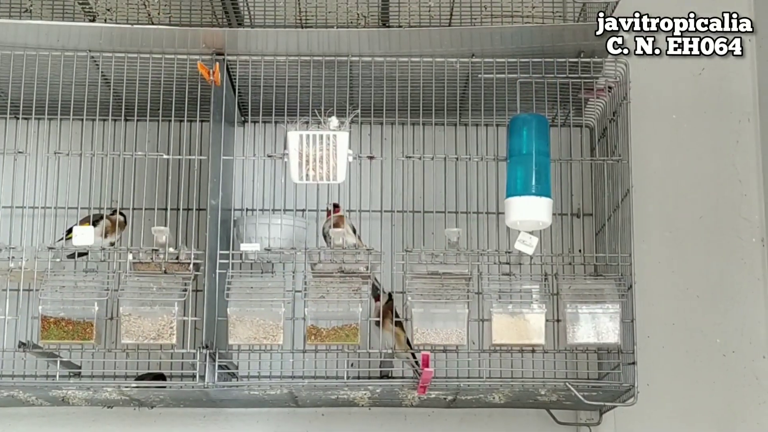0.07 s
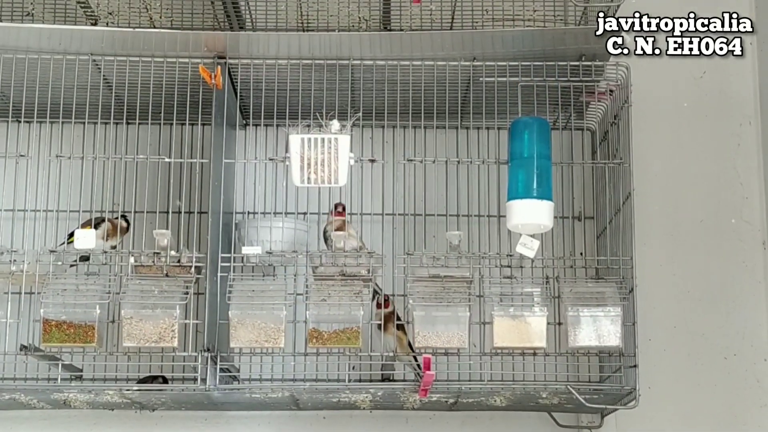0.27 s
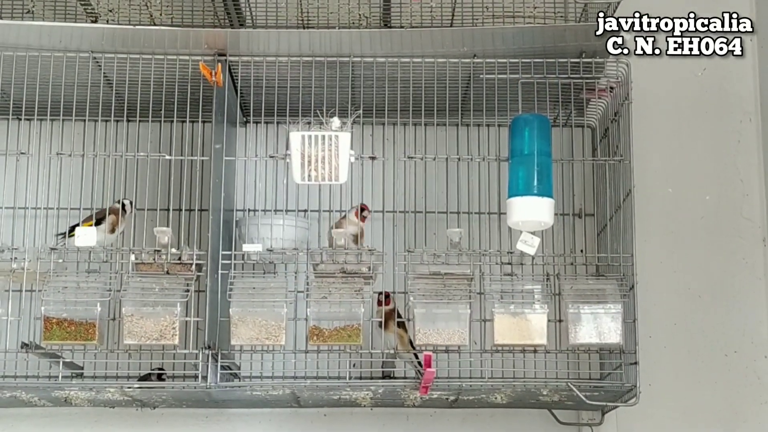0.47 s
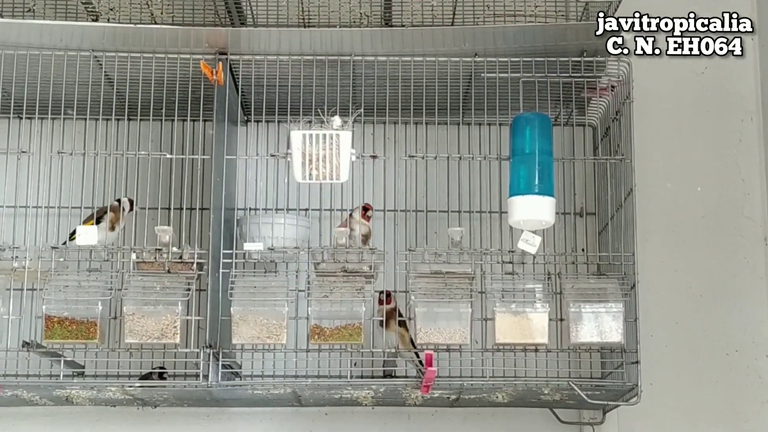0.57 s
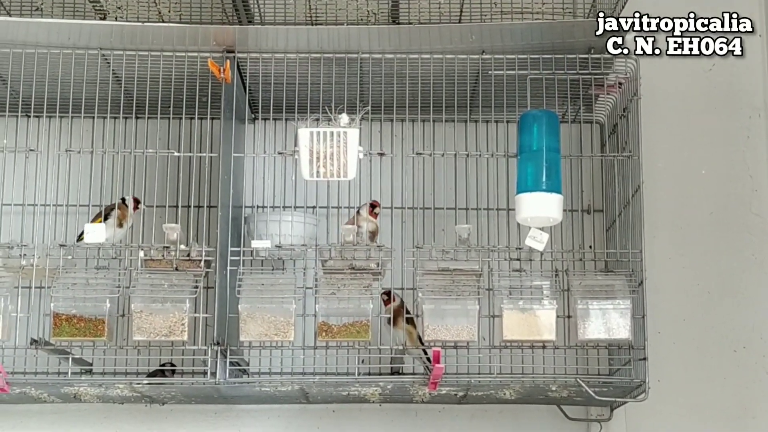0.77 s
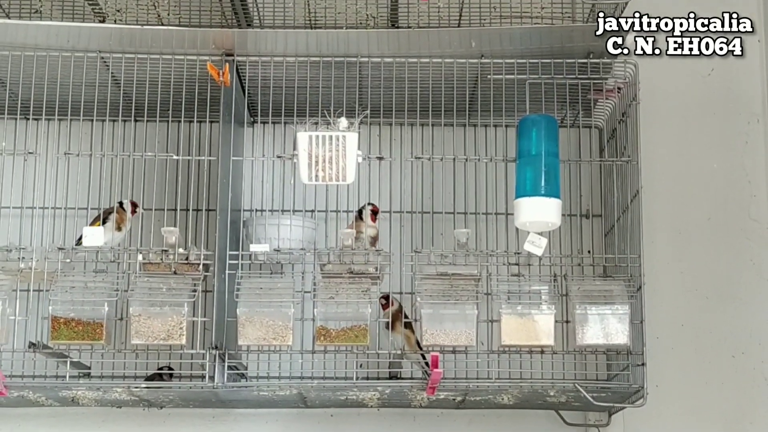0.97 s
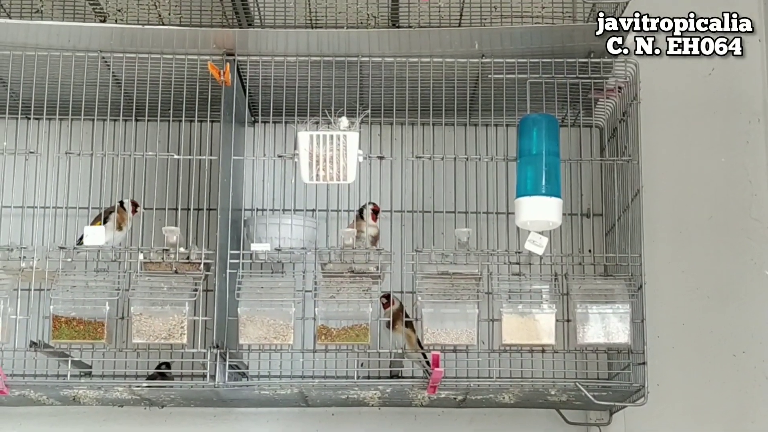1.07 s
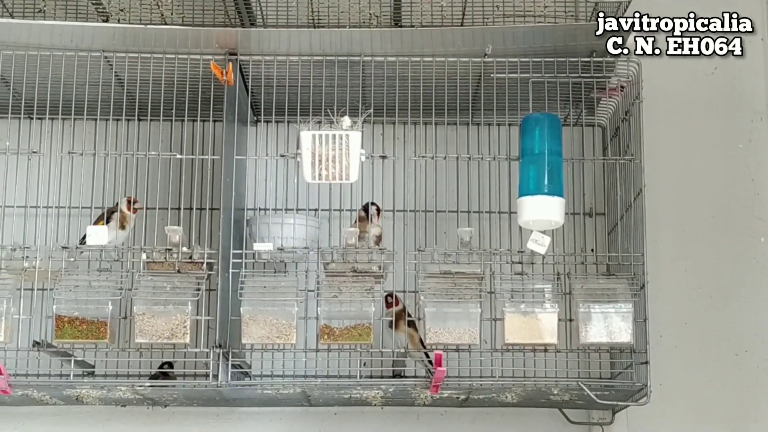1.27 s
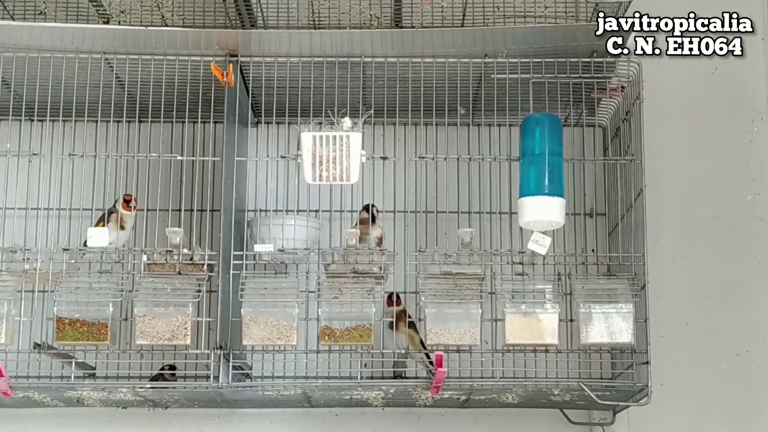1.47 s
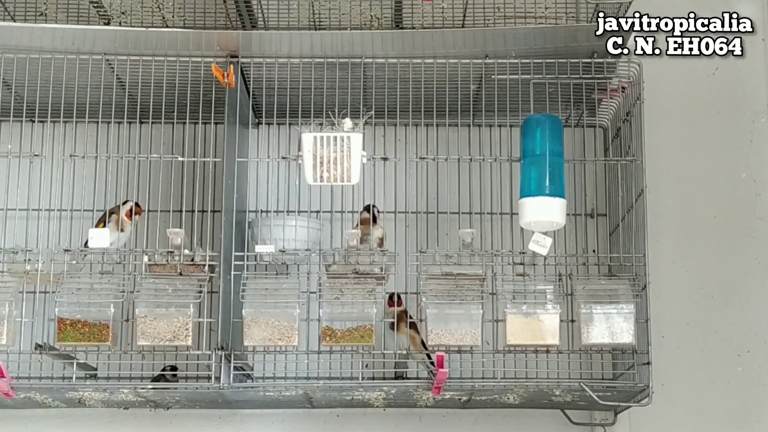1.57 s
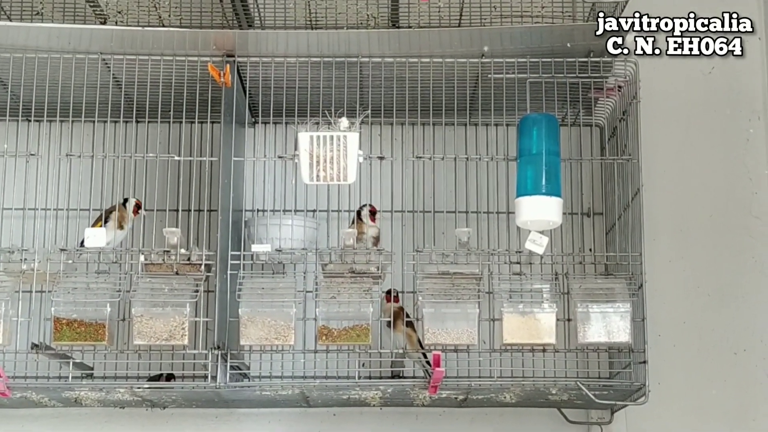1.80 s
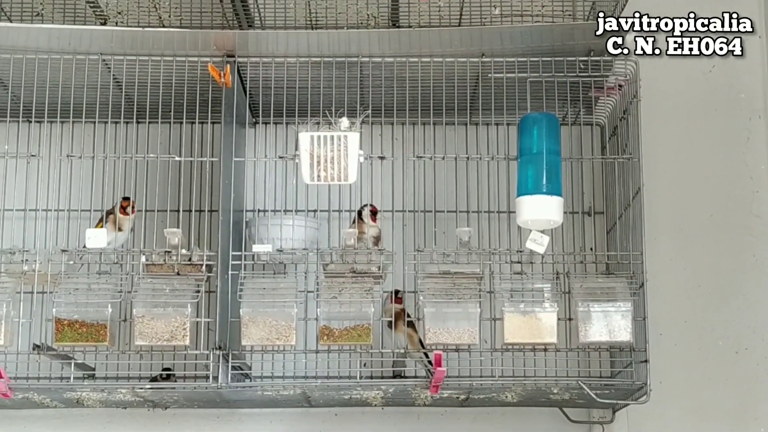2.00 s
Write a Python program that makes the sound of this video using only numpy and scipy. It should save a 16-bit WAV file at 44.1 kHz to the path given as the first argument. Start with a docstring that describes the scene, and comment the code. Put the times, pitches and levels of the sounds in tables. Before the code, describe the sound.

Bright, thin birdsong from caged finches comes in short bursts with gaps between, ending in a raspy chatter; beaks and claws tick on wire. Stereo microphone in a small reverberant room with faint low rumble.

```python
"""Goldfinches in a cage

Goldfinches twitter in a wire cage in a small, hard-walled room: two two-voiced chirps, a long rising slur
and a whistled phrase, all swept harmonic tones, then a short harsh chatter of pulsed resonant noise.
Beaks and claws tick on the cage as decaying noise clicks. Beneath lie shaped-noise air, a hum of sines
and a low rumble that drops away and partly returns."""
import sys
import numpy as np
from scipy import signal
from scipy.fft import rfft, irfft
from scipy.io import wavfile
from scipy.ndimage import uniform_filter1d

SR = 44100
rng = np.random.default_rng(int(sys.argv[2]) if len(sys.argv) > 2 else 0)


def unload_audio(sound):
    """Save the sound as a 16-bit wav file, at the path given as the first command line argument."""
    columns = np.transpose(np.atleast_2d(sound))
    # keep every value between -1 and 1, then stretch to whole-number steps
    steps = np.round(np.clip(columns, -1, 1) * 32767)
    wavfile.write(sys.argv[1], SR, steps.astype(np.int16))


N = 89964


def amp(db):
    """Decibels to gain."""
    return 10 ** (np.asarray(db) / 20)


def unit(x):
    """Scales to rms 1."""
    return x / np.sqrt(np.mean(x ** 2) + 1e-20)


def read(points, hz):
    """Reads a table on a log-frequency axis."""
    f, value = np.transpose(points)
    return np.interp(np.log(hz + 1), np.log(f), value)


def add(mix, start_s, sound, pan_db=0):
    """Places a sound in the stereo mix; positive pan is left."""
    part = mix[:, max(round(start_s * SR), 0):][:, :len(sound)]
    part += amp([[pan_db / 2], [-pan_db / 2]]) * sound[:part.shape[1]]


def sine(hz):
    """Unit sine that follows a pitch track."""
    return np.sin(2 * np.pi * np.cumsum(hz) / SR)


def noise(shape):
    """Noise of rms 1 with gain shape(Hz)."""
    spectrum = rfft(rng.standard_normal(N))
    return unit(irfft(spectrum * shape(np.fft.rfftfreq(N, 1 / SR)), N))


def colored(table):
    """Noise of rms 1 with the spectrum of a (freq_hz, level_db) table."""
    return noise(lambda f: amp(read(table, f)))


def wobble(hz):
    """Random motion up to a given speed."""
    return noise(lambda f: 1 / (1 + (f / hz) ** 4))


def band(hz, width_hz):
    """Noise in one resonance."""
    return noise(lambda f: 1 / (1 + ((f - hz) / width_hz * 2) ** 2))


def arch(u, peak, pointed):
    """One swell of effort, strongest at peak (0-1)."""
    warped = np.interp(u, [0, np.clip(peak, .05, .95), 1], [0, .5, 1])
    return np.abs(np.sin(np.pi * warped)) ** pointed


# air spectrum, relative: freq_hz, level_db
AIR_SPECTRUM = [(15, -10), (25, -4.5), (54, -2.5), (90, -14.5), (114, -8.5), (275, -10.5), (378, -12.5),
                (534, -14.5), (661, -14), (716, -12), (886, -15), (1040, -16), (3010, -21), (3540, -23),
                (4620, -33.5), (8510, -20.5), (14500, -37)]
# air stereo coherence: freq_hz, likeness_0_1
AIR_LIKENESS = [(100, 1), (250, 0.96), (500, 0.66), (1000, 0.16), (3000, 0), (12000, 0)]
AIR_DB, AIR_PATCH_DB = -40, 1.58


def air():
    """Moving air: shaped noise with patchy level, alike on both sides only at low frequencies."""
    hz, _, z = signal.stft(rng.standard_normal((2, N)), SR, nperseg=2048)
    same = np.clip(read(AIR_LIKENESS, hz), -1, 1)[:, None]
    z = np.array([z[0], same * z[0] + np.sqrt(1 - same ** 2) * z[1]])
    patches = uniform_filter1d(rng.standard_normal(z.shape[1:]), size=24, axis=0)
    patches = unit(uniform_filter1d(patches, size=3, axis=1))
    gain = amp(read(AIR_SPECTRUM, hz)[:, None] + AIR_PATCH_DB * patches)
    flow = signal.istft(z * gain, SR, nperseg=2048)[1][:, :N]
    return amp(AIR_DB) * unit(flow)


# machine hum partials: freq_hz, level_db
HUM_PARTIALS = [(118.6, -53), (220.7, -55.5), (269.2, -54), (538.3, -55), (597.5, -57.5), (721.4, -60.5)]
HUM_WAVER_RAD, HUM_WAVER_HZ = 0.33, 2.9


def hum():
    """Machine hum: steady sines whose phases wander slowly."""
    t = np.arange(N) / SR
    out = np.zeros(N)
    for hz, level_db in HUM_PARTIALS:
        phase = 2 * np.pi * (hz * t + rng.random()) + HUM_WAVER_RAD * wobble(HUM_WAVER_HZ)
        out += amp(level_db) * np.sqrt(2) * np.sin(phase)
    return out


# rumble level: time_s, level_db
RUMBLE_LEVEL = [(0, -41), (.4, -40), (.48, -47.5), (.66, -41.5), (.8, -62), (2.04, -49.5)]
RUMBLE_HZ, RUMBLE_WAVER_RAD, RUMBLE_WAVER_HZ = 46.4, 1, 15


def rumble():
    """Low rumble: one sine of wandering phase and changing level."""
    t = np.arange(N) / SR
    level = amp(np.interp(t, *np.transpose(RUMBLE_LEVEL)))
    phase = 2 * np.pi * RUMBLE_HZ * t + RUMBLE_WAVER_RAD * wobble(RUMBLE_WAVER_HZ)
    return level * np.sqrt(2) * np.sin(phase)


# ticks: start_s, level_db
TICK_EVENTS = [(.105, -31), (0.129, -33.5), (.805, -33), (.881, -28), (.959, -27.5), (.978, -38),
               (1.5, -33.5), (1.571, -28), (1.991, -33.5), (2.028, -43)]
# tick spectrum, relative: freq_hz, level_db
TICK_SPECTRUM = [(1500, -21), (3500, -8.5), (6000, -17.5), (8500, 2.5), (10500, -12), (15000, -20.5)]
TICK_DECAY_S = 0.0031


def ticks():
    """Beaks and claws on the cage: bright noise clicks that decay exponentially."""
    out, t = np.zeros((2, N)), np.arange(SR // 20) / SR
    for start_s, level_db in TICK_EVENTS:
        click = np.exp(-t / TICK_DECAY_S) * colored(TICK_SPECTRUM)[:len(t)]
        add(out, start_s, amp(level_db) * click)
    return out


# harsh syllables and raspy onsets: start_s, length_s, center_hz, width_hz, level_db, hiss_db (re resonance)
RASP_EVENTS = [(0.179, 0.029, 12200, 2500, -37, 3.5), (0.334, 0.069, 11700, 1600, -40, -4),
               (0.635, 0.032, 8400, 1600, -33, 1.5), (1.594, 0.028, 4900, 1500, -32, 1.5),
               (1.655, 0.036, 3850, 900, -33, 8), (1.66, 0.026, 7800, 2070, -21.5, -22),
               (1.716, 0.025, 4400, 1430, -29, -4), (2.027, 0.012, 5800, 2000, -38, 7.5)]
# rasp hiss spectrum, relative: freq_hz, level_db
RASP_HISS = [(1000, -38), (2000, -2), (2900, -9.5), (3700, 1), (6000, -7.5), (8500, 3), (11000, -7),
             (15000, -22)]
PULSE_HZ, PULSE_DEPTH = 392.4, 0.68
PULSE_DRIFT, PULSE_DRIFT_HZ = 0.262, 121  # share of pulse rate, speed
RASP_PEAK, RASP_POINTED = 0.47, 0.76


def chatter():
    """Harsh syllables: uneven puffs through a broad resonance, with hiss."""
    out = np.zeros((2, N))
    for start_s, length_s, center_hz, width_hz, level_db, hiss_db in RASP_EVENTS:
        u = np.linspace(0, 1, round(length_s * SR))
        puffs = 1 + PULSE_DEPTH * sine(PULSE_HZ * (1 + PULSE_DRIFT * wobble(PULSE_DRIFT_HZ)))
        breath = band(center_hz, width_hz) + amp(hiss_db) * colored(RASP_HISS)
        voice = (unit(puffs) * breath)[:len(u)]
        add(out, start_s, amp(level_db) * arch(u, RASP_PEAK, RASP_POINTED) * voice, pan_db=-1.6)
    return out


# spectrum of the hiss on each note, relative: freq_hz, level_db
NOTE_HISS = [(1200, -9), (2200, 2), (4000, -6), (6000, 2.5), (8500, 3), (12500, -6), (15000, -21)]
NOTE_HISS_DB = -19
# at full roughness: share of pitch, speed, share of level
JITTER, JITTER_HZ, SHIMMER = 0.047, 450, 0.3
FLUTTER, FLUTTER_HZ = 0.066, 259.2  # share of pitch at full roughness, speed
FLUTTER_DRIFT, FLUTTER_DRIFT_HZ = 0.17, 56.5  # share of flutter rate, speed
FOURTH_DB = -19  # re 3rd harmonic


def syrinx(hz, second_db, third_db, rough):
    """Whistle with overtones and hiss; pitch and level tremble with roughness."""
    n = len(hz)
    flutter = sine(FLUTTER_HZ * (1 + FLUTTER_DRIFT * wobble(FLUTTER_DRIFT_HZ)[:n]))
    hz = hz * (1 + rough * (JITTER * wobble(JITTER_HZ)[:n] + FLUTTER * flutter))
    tone = np.zeros(n)
    for k, db in enumerate([0, second_db, third_db, third_db + FOURTH_DB], 1):
        below_nyquist = k * hz < SR / 2
        tone += amp(db) * below_nyquist * sine(k * hz)
    shimmer = 1 + SHIMMER * rough * wobble(JITTER_HZ)[:n]
    hiss = amp(NOTE_HISS_DB) * colored(NOTE_HISS)[:n]
    return np.sqrt(2) * tone * shimmer + hiss


# whistled notes; overlapping rows sound together: paired voices, a combination tone, a strong overtone
# start_s, length_s, first_hz, middle_hz, last_hz, level_db, peak_0_1, pointedness,
# second_db (re fundamental), roughness_0_1, left_right_db
NOTE_EVENTS = [ (.192, 0.0326, 7020, 7700, 7200, -23, 0.27, 0.4, -34, 0.34, -2.5),
               (0.195, 0.04, 6140, 5620, 5740, -18.5, 0.78, 0.82, -19.5, 0.29, -1.5),
               (0.211, .018, 4005, 4017, 4250, -28.5, 0.74, 0.65, 7, 0.88, -2),
               (0.341, 0.0352, 6630, 7310, 7130, -21, 0, 0.84, -34, 0.15, -1),
               (0.347, .046, 6000, 5366, 5500, -19.5, 0.42, 1.3, -19.5, 0.42, -1.5),
               (0.389, .080, 1975, 2135, 2767, -38.5, 0.73, 0.53, -16, 0.78, -4),
               (0.399, 0.049, 3800, 4095, 5100, -34, 0.44, 0.33, -4.5, 0.27, -0.5),
               (.655, 0.049, 5920, 6670, 6670, -23, 0.12, 1, -21, 0.26, -2.5),
               (1.016, 0.066, 4120, 4388, 4445, -22, 0.81, 2.2, -9.5, 0.14, 2),
               (1.065, 0.016, 4710, 5400, 5860, -22, 0, 0.68, -16, 0.45, -1.5),
               (1.066, 0.014, 7900, 7870, 7800, -28.5, 0.3, .8, -40, 0.26, -6),
               (1.084, 0.026, 4760, 5590, 7410, -21.5, 0.72, 0.65, -32, 0.6, -2.5),
               (1.228, 0.02, 4434, 4946, 5000, -23, 0, 0.49, -11.5, 0.43, -2),
               (1.247, .019, 4320, 6000, 6900, -24.5, 0.16, 0.3, -26, 0.43, -2.5),
               (1.610, 0.017, 3626, 3496, 3440, -30, 0.6, 0.55, -9, 0.52, 3.5),
               (1.728, 0.02, 3720, 3575, 3520, -25.5, 0.13, 0.88, -20, 0.41, 2),
               (1.9, 0.047, 3540, 3602, 3650, -41, 0, 0.58, -8.5, 0, 4),
               (1.958, .025, 3500, 3500, 3850, -54, 0.8, .7, -9, 0.1, 2)]
NOTE_THIRD_DB = -26  # re fundamental


def notes():
    """Short notes, each bent along a parabola through three pitches."""
    out = np.zeros((2, N))
    for start_s, length_s, first, middle, last, level_db, peak, pointed, second_db, rough, pan_db in NOTE_EVENTS:
        u = np.linspace(0, 1, round(length_s * SR))
        hz = np.polyval(np.polyfit([0, .5, 1], [first, middle, last], 2), u)
        voice = syrinx(hz, second_db, NOTE_THIRD_DB, rough)
        add(out, start_s, amp(level_db) * arch(u, peak, pointed) * voice, pan_db)
    return out


# long rising slur: time_s, pitch_hz, level_db, second_db, third_db (re fundamental), roughness_0_1
RISING_SLUR = [(.463, 2846, -38, -8, 1, 0.24), (0.476, 3090, -27.5, 4.5, 7, 0.16),
               (.497, 3405, -27.5, -1.5, -8.5, 0.27), (.515, 3772, -16, -31, -47, 0.14),
               (.520, 3944, -17, -24, -39, .1), (.530, 4090, -30.5, 1, -28, 0.2),
               (0.561, 4640, -21.5, -5, -16, 0.18), (.604, 5300, -32, -25, -52, 0.35),
               (.615, 5554, -18, -8.5, -45, 0), (.628, 5590, -38, -14, -45, 0),
               (.648, 5600, -39, 3, -45, 0.2)]
# low drawn-out whistle: same columns
LOW_WHISTLE = [(1.068, 3320, -29, -14, -12, .15), (1.084, 3417, -21, -24, -15, 0.082),
               (1.101, 3503, -17.5, -31, -28, .12), (1.124, 3540, -20.5, -35, -31, 0.094),
               (1.147, 3686, -18.5, -20, -25, 0.43), (1.165, 3936, -19, -8, -25, 0.35),
               (1.19, 3926, -44, -5, -25, .5), (1.227, 4210, -29.5, -1, -21, 0.48)]


def glides():
    """Two long glides: pitch, level and overtones move between breakpoints."""
    out = np.zeros((2, N))
    for glide in (RISING_SLUR, LOW_WHISTLE):
        times, *columns = np.transpose(glide)
        t = np.arange(times[0], times[-1], 1 / SR)
        hz, level_db, second_db, third_db, rough = (np.interp(t, times, c) for c in columns)
        envelope = amp(level_db) * signal.windows.tukey(len(t), .05)
        add(out, times[0], envelope * syrinx(hz, second_db, third_db, rough), pan_db=-0.2)
    return out


# reverberation time: freq_hz, t60_s
ROOM_DECAY = [(500, 1), (3500, 0.39), (6000, 0.36), (9000, 0.35), (14000, 0.27)]
DIRECT_DB, EARLY_DB, TAIL_DB = -7, -3.5, -2.5
EARLY_DECAY_S, EARLY_PER_S = 0.013, 900


def room(x):
    """Direct sound, quick reflections from the cage panels, and the tail of the room."""
    t = np.arange(SR // 2) / SR
    taps = rng.standard_normal((2, len(t))) * np.clip((t - .004) / 0.0027, 0, 1)
    hz, when, z = signal.stft(taps, SR, nperseg=256)
    decay = amp(-60 * when / read(ROOM_DECAY, hz)[:, None])
    tail = signal.istft(z * decay, SR, nperseg=256)[1][:, :len(t)]
    signs = rng.choice([-1., 1.], tail.shape)
    hits = rng.random(tail.shape) < EARLY_PER_S / SR
    early = signs * hits * np.exp(-t / EARLY_DECAY_S) * (t > .001)
    response = np.zeros(tail.shape)
    for db, part in [(EARLY_DB, early), (TAIL_DB, tail)]:
        response += amp(db) * part / np.linalg.norm(part, axis=1, keepdims=True)
    return amp(DIRECT_DB) * x + signal.fftconvolve(x, response, axes=1)[:, :N]


# microphone colour: freq_hz, left_right_db
MIC_TILT = [(2000, 1), (3500, 3), (5000, -1), (6500, 0.5), (8000, -2), (9300, 6), (13000, 3)]
RIGHT_DELAY_S = .00013  # left microphone is nearer


def microphones(x):
    """Each side has its own colour, and the right one hears the birds slightly later."""
    hz = np.fft.rfftfreq(N, 1 / SR)
    tilt_db = read(MIC_TILT, hz)
    delay = np.exp(-2j * np.pi * hz * RIGHT_DELAY_S)
    return irfft(rfft(x) * np.array([amp(tilt_db / 2), amp(-tilt_db / 2) * delay]), N)


def scene():
    """The birds in their room, over air, hum and rumble."""
    background = air() + hum() + rumble()
    birds = ticks() + chatter() + notes() + glides()
    return background + microphones(room(birds))


CUT_HZ = 14700


def record(dry):
    """Band limit: linear-phase low-pass."""
    lowpass = signal.firwin(401, CUT_HZ, window=("kaiser", 9), fs=SR)
    return signal.oaconvolve(dry, lowpass[None], "same")


dry = scene()
out = record(dry)
unload_audio(out)
```